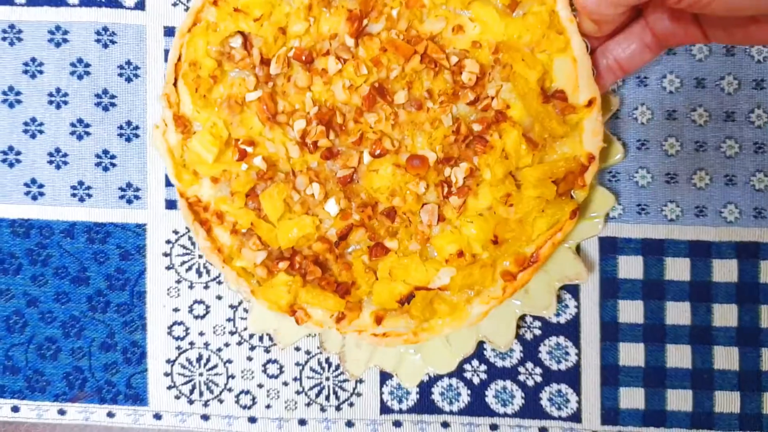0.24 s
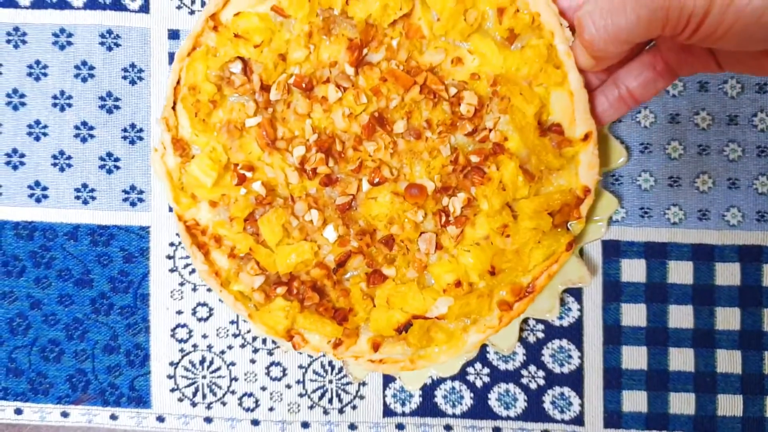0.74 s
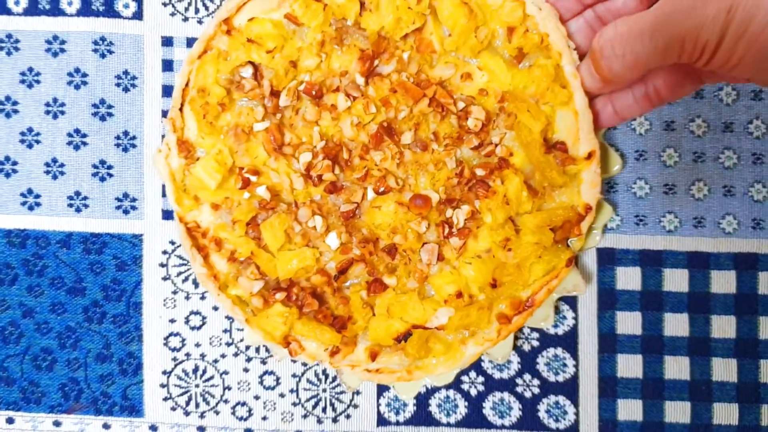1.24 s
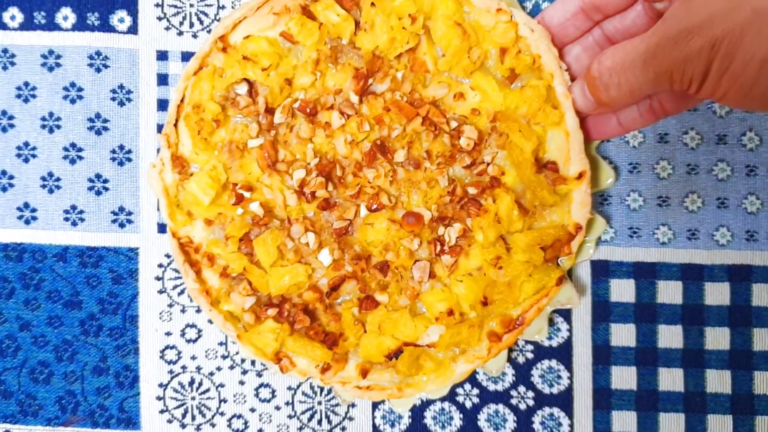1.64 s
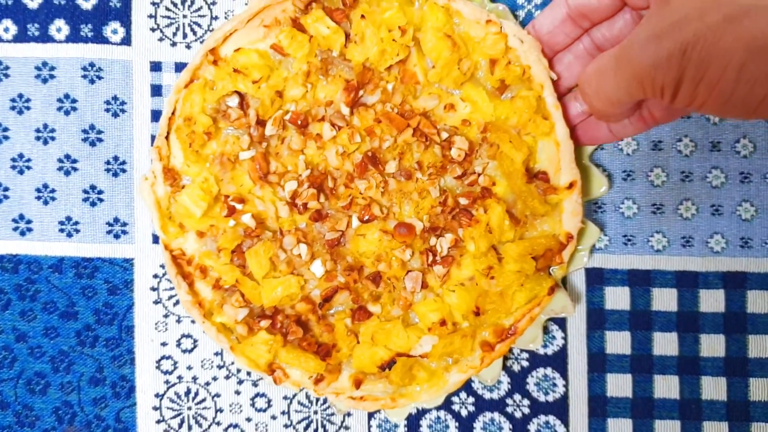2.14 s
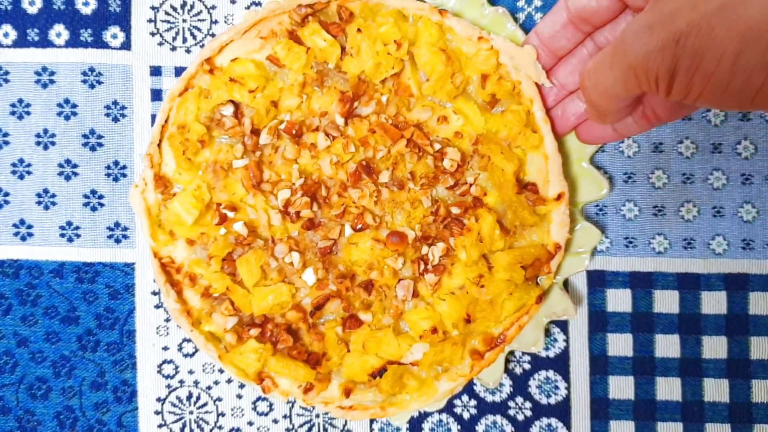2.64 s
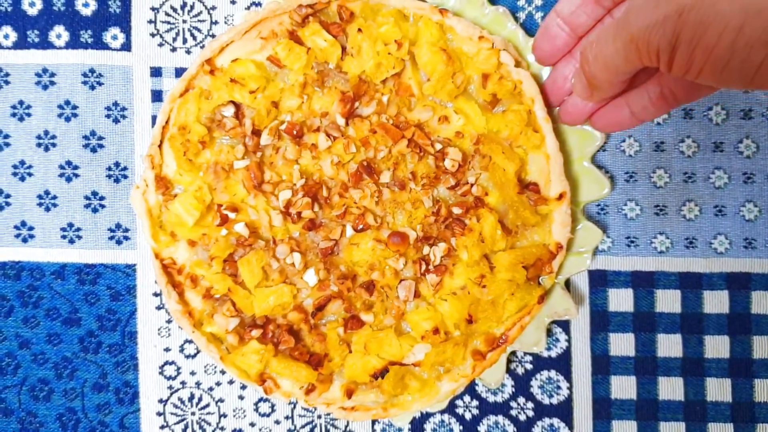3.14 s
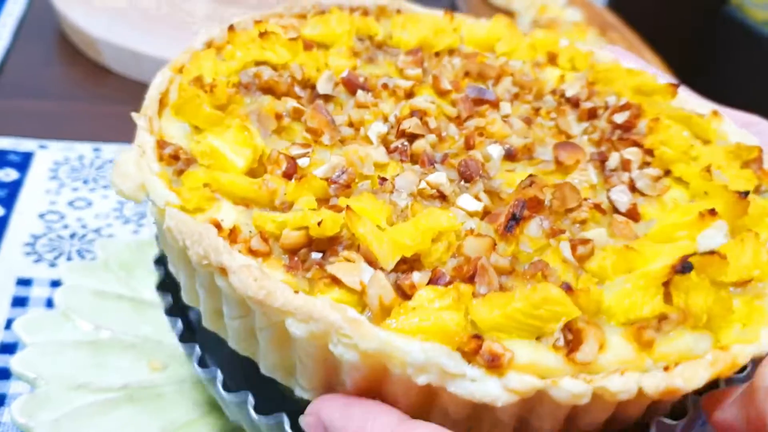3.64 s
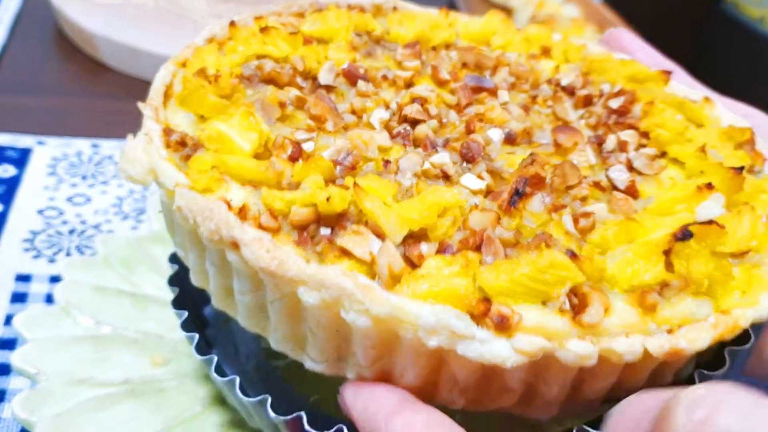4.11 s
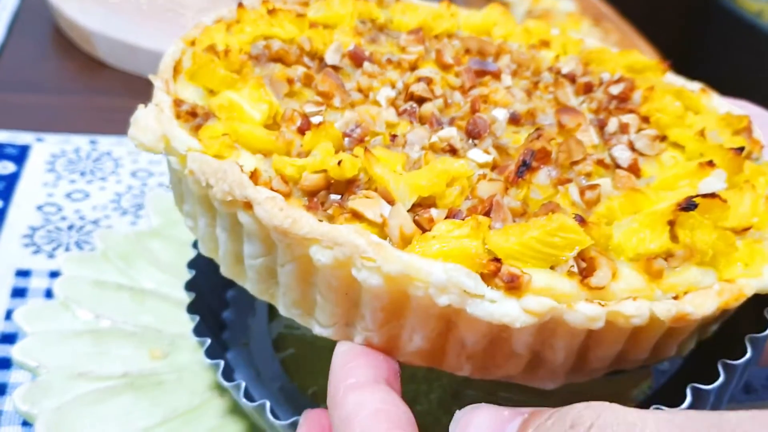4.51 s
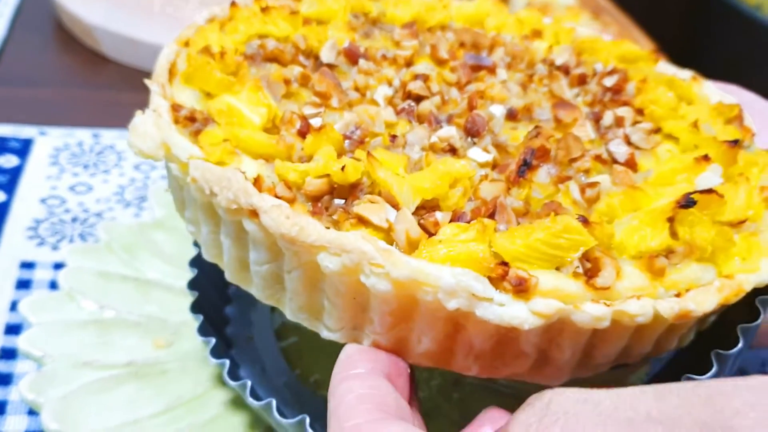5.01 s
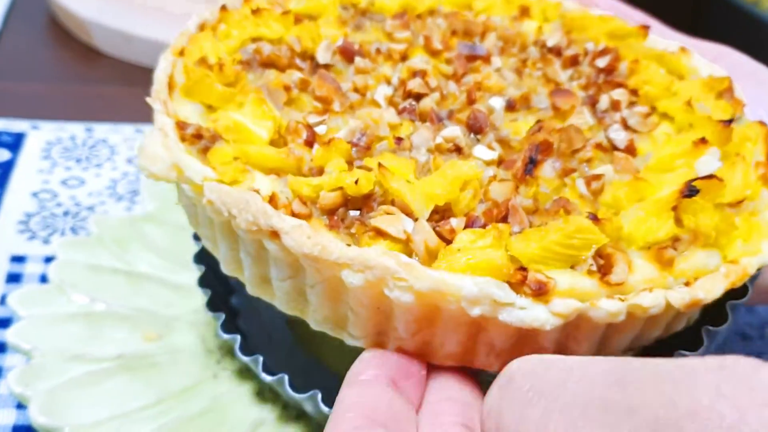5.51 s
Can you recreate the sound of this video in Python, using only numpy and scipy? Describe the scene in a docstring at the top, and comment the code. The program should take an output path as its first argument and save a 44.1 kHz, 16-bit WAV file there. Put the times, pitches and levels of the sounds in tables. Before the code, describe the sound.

A soft tap and then one loud, quickly damped knock sound as a ceramic plate is set on a tablecloth, a little way from the stereo microphone, with a short kitchen echo. Heard from closer, a metal tart tin then scrapes softly and clinks against the plate, making it ring briefly. A low fridge hum continues underneath.

```python
"""A quiet kitchen with a humming fridge, on a stereo microphone. From the far position, a loaded ceramic
plate knocks on a cloth-covered table: the cloth mutes its modes, the table top thumps, the room echoes.
Then, from a closer position to the plate's right, a metal tart tin slides and clinks on it: grit hisses
under the tin and sets the plate singing, and each clink clacks the tin and rings the plate."""
import sys
import numpy as np
from scipy import signal
from scipy.fft import rfft, irfft
from scipy.io import wavfile
from scipy.ndimage import uniform_filter1d

SR = 44100
rng = np.random.default_rng(int(sys.argv[2]) if len(sys.argv) > 2 else 0)


def waveform_to_disk(signal):
    """Save audio, clipped to [-1, 1], as 16-bit WAV at the path in sys.argv[1]."""
    frames = np.transpose(np.atleast_2d(signal))
    scaled = np.clip(frames, -1, 1) * 32767
    samples = np.round(scaled).astype(np.int16)
    wavfile.write(sys.argv[1], SR, samples)


N = 254016
CLOSE_S, CUT_S = 3.352, 5.718  # the close position begins; the tin's sound drops abruptly at a cut


def gain_of(db):
    """dB to gain."""
    return 10 ** (np.asarray(db) / 20)


def unit_rms(x):
    """Scales to rms 1."""
    return x / np.sqrt(np.mean(x ** 2) + 1e-20)


def curve_at(points, hz):
    """Reads a curve on a log-frequency axis."""
    f, value = np.transpose(points)
    return np.interp(np.log(hz + 1), np.log(f + 1), value)


def add(mix, s, sound):
    """Mixes a sound in at second s."""
    part = mix[..., round(s * SR):][..., :sound.shape[-1]]
    part += sound[..., :part.shape[-1]]


def colour(x, points, late_s=0.):
    """Filters by a dB spectrum and delays."""
    hz = np.fft.rfftfreq(len(x), 1 / SR)
    return irfft(rfft(x) * gain_of(curve_at(points, hz)) * np.exp(-2j * np.pi * hz * late_s), len(x))


# Room tone at the far and the close position. Each row: frequency in Hz, relative level in dB.
FAR_TONE = [(20, -17.5), (48, -6.5), (150, -7.5), (293, -16.5), (330, -18.5), (607, -15.5), (900, -23),
            (1500, -29.5), (4000, -44), (5900, -52.5), (7700, -47), (8700, -61.5), (12000, -55),
            (16000, -60)]
CLOSE_TONE = [(20, -10), (60, -7), (123, -6), (285, -12), (400, -14), (1260, -19.5), (2320, -31.5),
              (4400, -34.5), (5900, -40.5), (7700, -38), (8700, -54), (16000, -74.5)]
# The room across the microphone. Each row: frequency in Hz, left-right likeness from 0 to 1.
LIKENESS = [(60, 0.94), (300, 1), (700, 0.38), (1500, 0.11), (4000, 0.054), (15000, .05)]
# The room tone leans left. Each row: frequency in Hz, left minus right in dB.
TONE_LEAN = [(60, 2), (180, 0.5), (550, 1.5), (1650, 1.5), (4970, 5.5), (15000, 4.5)]
def room_tone(spectrum, level_db, left_lead_s=.00043):
    """Air and fridge noise, alike on both sides of the microphone only in the bass."""
    frames, hz = N // 512 + 5, np.fft.rfftfreq(2048, 1 / SR)
    a, b, c, d = rng.standard_normal((frames, 1025, 4)).T
    left, unrelated = a + 1j * b, c + 1j * d
    same = np.clip(curve_at(LIKENESS, hz), 0, 1)[:, None]
    delay = np.exp(-2j * np.pi * hz * left_lead_s)[:, None]
    right = same * left * delay + np.sqrt(1 - same ** 2) * unrelated
    lean_db = curve_at(TONE_LEAN, hz) / 2
    gains = gain_of(curve_at(spectrum, hz) + np.array([lean_db, -lean_db]))
    noise = signal.istft(np.array([left, right]) * gains[..., None], nperseg=2048, noverlap=1536)[1]
    return gain_of(level_db) * unit_rms(noise[:, :N])


# The fridge from each position. Each row: rms level in dB, waver width in Hz, waver depth.
FAR_HUM = [(-67.5, 6, .5), (-57.5, 3.6, 0.22), (-73, 6, .5), (-81.5, 6.5, .5), (-75, 4, .4)]
CLOSE_HUM = [(-63.5, 35, 0.27), (-53.5, 40, 0.7), (-66, 12.5, 1), (-95, 14, .6), (-77.5, 6.7, 0.43),
             (-71, 1.8, .6)]
FAR_HUM_HZ, CLOSE_HUM_HZ = [360, 471, 530, 592, 1394], [59, 118, 296, 355, 414, 473]
def fridge_hum(hum_hz, lines, left_lead_s=.00015):
    """Narrow, wavering hum lines that reach the left side a little early."""
    t = np.arange(N) / SR - left_lead_s * np.c_[[0, 1]]
    out = np.zeros((2, N))
    for hz, (db, width_hz, depth) in zip(hum_hz, lines):
        r = np.exp(-np.pi * width_hz / SR)
        waver = unit_rms(signal.lfilter([1], [1, -2 * r, r * r], rng.standard_normal((2, N))))
        line = (1 + depth * (waver[0] + 1j * waver[1])) * np.exp(2j * np.pi * hz * t)
        out += gain_of(db) * unit_rms(line.real)
    return out


# The frequencies in Hz at which a blow's colour, its shade, is set.
SHADE_HZ = [1100, 1750, 3100, 5000, 7600, 12000]
def shade(tilt_db, rounding_db):
    """A blow's colour in dB: a tilt per octave, less a rounding per octave squared."""
    octaves = np.log2(np.divide(SHADE_HZ, SHADE_HZ[2]))
    return tilt_db * octaves - rounding_db * octaves ** 2


def ring(hz, db, t60, shade_db=(0,) * 6, damping=0.95, *, rise_s, size):
    """Decaying modes after one blow, weighted by its colour."""
    db = db + curve_at(np.c_[SHADE_HZ, shade_db], hz)
    t = np.arange(size) / SR
    decay = gain_of(db[:, None] - 60 * t * damping / t60[:, None])
    attack = (1 - np.exp(-t / rise_s)) ** 2
    return (decay * np.sin(2 * np.pi * hz[:, None] * t)).sum(0) * attack


# The contact's crack, as coloured by the microphone. Each row: frequency in Hz, relative level in dB.
CRACK_AT_MIC = [(500, -25), (1500, -1), (5000, 1), (6000, -9), (7800, -3.5), (9000, -13.5), (12000, -21),
                (16000, -27)]
def crack(shade_db, t60):
    """The contact's dry crack, as coloured by the microphone."""
    t = np.arange(3000) / SR
    noise = colour(rng.standard_normal(len(t)), CRACK_AT_MIC)
    noise = colour(noise, np.c_[SHADE_HZ, shade_db])
    return unit_rms(noise) * gain_of(-60 * t / t60) * (1 - np.exp(-t / .0005))


# Knocks from the far position. Each row: start in seconds, level in dB, damping factor, tilt in dB per
# octave, rounding in dB per octave squared, echo send in dB, left minus right in dB.
PLATE_KNOCKS = [(0.6194, -28, 2.1, -4.5, 4.5, 6, 6), (0.6875, -39, 2.2, -5.5, 5, 4.5, 8),
                (2.336, -39.5, 2.3, -2.5, 0, 6, 3.5), (2.3535, -19.5, 1.1, -0.5, 2, 0, 2),
                (2.359, -15, 0.74, -4, -3.3, -0.5, 5), (2.3613, -5, 2.7, -0.16, 1.85, 0.3, 5.5),
                (2.364, -14.5, 1.7, 2.5, 2.5, -1.7, 3.5), (2.3783, -23.5, 1.9, 3, 1.5, -5.2, 3.5),
                (2.663, -65, 4.8, -9, -4, -2.1, 1), (3.0178, -35.5, 1.9, -15, 0.5, 4.5, 9)]
# The loaded plate pressed into cloth: its modes in Hz. Each row after that: level in dB, t60 in seconds.
MUTED_HZ = np.array([730, 880, 960, 1066, 1200, 1720, 1892, 2352, 2702, 3140, 3350, 3850, 4100, 4798, 5132, 7630, 8320, 11000])
MUTED_MODES = [(-22, 0.029), (-11, .035), (0, 0.086), (9, 0.078), (13.5, 0.016), (9.5, 0.032),
               (-5.5, 0.078), (-8, 0.011), (2.5, 0.023), (-5.5, 0.095), (2.5, 0.029), (-4.5, 0.012),
               (-13, 0.012), (-13, .025), (-1.5, 0.046), (-12, .03), (-19.5, 0.09), (-33, 0.0139)]
# The table top. Each row: frequency in Hz, level in dB, t60 in seconds.
TABLE_MODES = [(76.5, -1, 0.11), (186, 3.5, 0.089), (330, -5.5, 0.059), (439, -12, 0.058)]
# Echo reaching the far position. Each row: frequency in Hz, gain in dB.
FAR_ECHO = [(300, -4.5), (620, -10), (1000, -14), (1900, -4), (3200, -4.5), (6000, -1.5), (12000, 1.5)]
def plate_knocks():
    """The plate meets the cloth: muted modes, a dry crack, a table thump and the kitchen's echo."""
    plate, thump, echo_send = np.zeros((2, N)), np.zeros(N), np.zeros(N)
    table = ring(*np.transpose(TABLE_MODES), rise_s=0.005, size=12000)
    for s, db, damping, tilt_db, rounding_db, echo_db, left_db in PLATE_KNOCKS:
        shade_db = shade(tilt_db, rounding_db)
        blow = ring(MUTED_HZ, *np.transpose(MUTED_MODES), shade_db, damping, rise_s=0.00024, size=5000)
        blow /= abs(blow).max()
        add(blow, 0, gain_of(-12) * crack(shade_db, t60=0.029))
        add(plate, s, gain_of(db + np.c_[[left_db, -left_db]] / 2) * blow)
        add(echo_send, s, gain_of(db + echo_db) * blow)
        add(thump, s, gain_of(-12.5 + 1.9 * db) * table)  # the thump grows faster than the blow
    return plate + thump * gain_of([[1.1], [-1.1]]) + kitchen_echo(colour(echo_send, FAR_ECHO))


# The kitchen's decay. Each row: frequency in Hz, t60 in seconds.
KITCHEN_T60 = [(100, .2), (500, 0.27), (1100, 0.26), (2000, 0.24), (4000, 0.25), (8000, 0.16),
               (15000, 0.23)]
def kitchen_echo(x):
    """Sparse reflections of random sign, each band dying at its own speed, alike in the bass."""
    taps = np.zeros((2, SR // 2))
    slots = np.arange(120, SR // 2 - 20, 20)
    arrivals = slots + rng.integers(0, 20, (2, len(slots)))
    np.put_along_axis(taps, arrivals, rng.choice([-1., 1.], arrivals.shape), 1)
    hz, t, (left, unrelated) = signal.stft(taps, SR, nperseg=256)
    same = np.clip(curve_at(LIKENESS, hz), 0, 1)[:, None]
    right = same * left + np.sqrt(1 - same ** 2) * unrelated
    decay = gain_of(-60 * t / curve_at(KITCHEN_T60, hz)[:, None])
    tail = signal.istft(np.array([left, right]) * decay, SR, nperseg=256)[1]
    return signal.fftconvolve(x[None], tail / np.linalg.norm(tail[0]), axes=1)[:, :N]


# Slow sliding, close up. Each row: time in seconds, scrape level in dB.
SLIDE_LEVELS = [(3.351, -63.5), (3.5, -59), (3.62, -62.5), (3.74, -62), (3.88, -67), (3.95, -61.5),
                (4.051, -57), (4.15, -57.5), (4.2, -62.5), (4.28, -61), (4.38, -59.5), (4.55, -81),
                (4.7, -70), (4.85, -61), (5.0, -69), (5.3, -67), (5.4, -70), (5.72, -72)]
# The grit's hiss. Each row: frequency in Hz, relative level in dB.
SCRAPE_SPECTRUM = [(800, -22), (1220, -10), (2000, -0.5), (3010, 12.5), (4800, -6), (6500, 7), (8650, -3.5),
                   (11500, -3), (14000, -9), (16000, -16)]
# Quick slips. Each row: crest time in seconds, rise in seconds, crest level in dB, low cut in Hz.
TIN_SLIPS = [(3.541, .003, -60, 5030), (3.625, 0.013, -58.5, 5000), (3.806, 0.023, -55.5, 6000),
             (3.831, 0.014, -51.5, 2480), (4.32, 0.022, -52, 8000), (4.756, 0.0036, -48, 2000),
             (4.914, 0.0083, -38.5, 2450), (5.44, 0.032, -50, 5960), (5.605, .008, -60, 5000),
             (5.685, 0.026, -51.5, 6000)]
def tin_slide():
    """Grit under the moving tin hisses and feeds the plate's modes; quick slips add bright swishes."""
    t = np.arange(N) / SR
    scrape_db = np.interp(t, *np.transpose(SLIDE_LEVELS))
    excess_db = scrape_db + 66  # above a gentle slide
    noise = rng.standard_normal(N)
    roughness_db = 1.9 * unit_rms(uniform_filter1d(rng.standard_normal(N), size=60))
    grit = unit_rms(noise * gain_of(roughness_db))
    hiss = unit_rms(colour(grit, SCRAPE_SPECTRUM))
    low = signal.sosfiltfilt(signal.butter(2, 9000, fs=SR, output="sos"), hiss)
    tilt_db = 2 + .9 * excess_db  # faster sliding is brighter
    out = (low * gain_of(-tilt_db) + (hiss - low) * gain_of(tilt_db)) * gain_of(scrape_db)
    force = gain_of(-69.5 + 0.43 * excess_db)  # the plate's ring follows the scrape only in part
    for crest_s, rise_s, db, low_hz in TIN_SLIPS:
        span = slice(round((crest_s - .1) * SR), round((crest_s + .2) * SR))
        late_s = t[span] - crest_s
        fall_s = 0.0089 * gain_of(0.73 * (db + 46))  # stronger slips trail longer
        swell = np.where(late_s < 0, np.exp(-(late_s / rise_s) ** 2), np.exp(-abs(late_s) / fall_s))
        low_cut = signal.butter(2, low_hz, "high", fs=SR, output="sos")
        out[span] += gain_of(db) * swell * signal.sosfilt(low_cut, hiss[span])
        force[span] += gain_of(db + 0.5) * swell
    return out + plate_singing(grit * force)


# The free plate: its modes in Hz. Each row after that: level in dB struck at the rim, level in dB
# struck at the foot, t60 in seconds.
PLATE_HZ = np.array([936, 1210, 1432, 1701, 1868, 2036, 2256, 2503, 2745, 2950, 3042, 3146, 3289, 3440, 3850, 4210, 4592, 5120, 5245, 6247, 6670, 7420, 7619, 8190, 9150, 10760, 11650, 12400, 14200])
PLATE_MODES = [(-30.5, -17, 0.38), (-39, -14, 0.092), (-26, -22, 0.084), (1.5, -18, 0.23), (-49, 12, 0.22),
               (-23.5, -5.5, 0.46), (-22, -45, 0.31), (-21, -32, 0.24), (-17, -7, 0.15), (0, -1, 0.094),
               (10.5, -16, 0.077), (-23, -19, 0.27), (-4, -1.5, 0.11), (-17, -16, 0.11), (-36, -20, 0.14),
               (-47, -28, .2), (1.5, -30, 0.092), (-21, -15, 0.09), (-7, -5, 0.093), (2, -41, 0.045),
               (-12, -20, 0.068), (-37, -33, 0.11), (-5.5, 2.5, 0.096), (-28, -19, 0.15), (-39, -22, 0.055),
               (-27, -7, 0.14), (-22, -28, 0.049), (-24, -33, .05), (-32, -33, 0.054)]
# How rubbing feeds the modes. Each row: frequency in Hz, gain in dB.
RUB_COUPLING = [(936, -19.5), (1210, -7), (1700, -25), (2400, -38), (3050, -11), (3400, -24), (4600, -28),
                (6250, -14.5), (7600, -14.5), (9150, -15), (14200, -21)]
def plate_singing(push, damping=1.9, flare_db=7.8):
    """The contact wanders over the plate, so each mode flares for a moment and fades."""
    start, out = round(CLOSE_S * SR), np.zeros(N)
    flares = rng.standard_normal((40, len(PLATE_MODES)))
    path = np.linspace(0, 39, N - start)
    for hz, (_, _, t60), flare in zip(PLATE_HZ, PLATE_MODES, flares.T):
        wander_db = flare_db * np.interp(path, np.arange(40), flare)
        drive = push[start:] * gain_of(curve_at(RUB_COUPLING, hz) + wander_db)
        r, cosine = 10 ** (-3 * damping / (t60 * SR)), np.cos(2 * np.pi * hz / SR)
        mode = signal.lfilter([1, -cosine], [1, -2 * r * cosine, r * r], drive)
        out[start:] += np.sqrt(1 - r * r) * mode
    return out


# The tin, held in the fingers. Each row: frequency in Hz, level in dB, t60 in seconds.
TIN_MODES = [(540, -19.5, 0.029), (1248, -9.5, 0.072), (1752, 4.5, 0.029), (2140, -10.5, 0.052),
             (3097, 0.5, 0.04), (3896, -2.5, 0.023), (5137, -5.5, 0.061), (6264, 5, 0.012),
             (7730, -1.5, 0.021), (9380, -12, 0.02), (11070, -10, 0.013), (12900, -18, 0.017)]
# Nudges, close up. Each row: start in seconds, strength in dB, damping factor.
TIN_NUDGES = [(3.765, -58, 1.2), (3.824, -51, .55), (4.619, -41, 1.1), (5.1455, -42, .45)]
# Their dull colour, in dB at each of SHADE_HZ.
NUDGE_SHADE = [20, -5, -7, -18, -12, -10]
def tin_nudges():
    """A slow, soft contact on the tin's floor wakes its low notes and leaves the plate alone."""
    out = np.zeros(N)
    for s, db, damping in TIN_NUDGES:
        tin = ring(*np.transpose(TIN_MODES), NUDGE_SHADE, damping, rise_s=.002, size=8000)
        add(out, s, gain_of(db) * tin)
    return out


# Tin on plate, close up. Each row: start in seconds, strength in dB, damping factor, strike spot from
# rim (0) to foot (1), tilt in dB per octave, rounding in dB per octave squared.
TIN_CLINKS = [(4.241, -23, 0.89, .17, -0.9, .3), (4.6332, -16.5, 0.99, .17, -1, 0.3),
              (4.753, -42.5, 3, 0.34, -6, -0.5), (4.8135, -50, .9, .3, -8, 2.5),
              (4.9166, -23.5, 1.34, 0.38, -1.8, 1.2), (5.1747, -27, 1.36, 0.65, -1.8, 1.2),
              (5.2854, -56.5, 1.7, 0.77, -5.5, 0), (5.4689, -46.5, 1.8, 0.63, -7.5, 0),
              (5.605, -43, 1.2, 0.5, -6, 1.6), (5.6905, -40.5, 1.8, 0.6, -1.3, -0.7)]
def tin_clinks(free_hz=2036):
    """Each touch clacks the tin and rings the plate; the strike spot weights the plate's modes."""
    rim_db, foot_db, t60 = np.transpose(PLATE_MODES)
    out = np.zeros(N)
    for s, db, damping, spot, tilt_db, rounding_db in TIN_CLINKS:
        shade_db = shade(tilt_db, rounding_db)
        modes_db = rim_db + spot * (foot_db - rim_db)
        held_t60 = t60 / np.where(PLATE_HZ == free_hz, 1, damping)  # the grip leaves one mode ringing
        clink = ring(PLATE_HZ, modes_db, held_t60, shade_db, damping=0.97, rise_s=0.0019, size=16000)
        clack = ring(*np.transpose(TIN_MODES), shade_db, rise_s=0.00027, size=5000)
        clack_db = -0.53 - 0.16 * db  # light touches clack the tin more than they ring the plate
        add(clink, 0, gain_of(clack_db) * clack)
        add(clink, 0, gain_of(clack_db - 5) * crack(shade_db, t60=0.047))
        add(out, s, gain_of(db) * clink)
    return out


# Close up, the microphone's right side is shadowed from the tin. Each row: frequency in Hz, gain in dB.
RIGHT_SHADOW = [(300, -20), (1000, -8), (1700, -18), (3500, -4.5), (7000, -40), (15000, -31)]
def scene():
    """The far position for the knocks, then the close one for the tin."""
    t = np.arange(N) / SR
    far = room_tone(FAR_TONE, level_db=-52) + fridge_hum(FAR_HUM_HZ, FAR_HUM) + plate_knocks()
    tin = tin_clinks() + tin_nudges() + tin_slide()
    close = np.array([tin, colour(tin, RIGHT_SHADOW, late_s=.0001)]) + gain_of(-13.5) * kitchen_echo(tin)
    close *= np.clip((CUT_S - t) / 0.0015, .25, 1)  # the tin's sound drops abruptly at the cut
    close += room_tone(CLOSE_TONE, level_db=-53.5) + fridge_hum(CLOSE_HUM_HZ, CLOSE_HUM)
    switch = np.clip((t - CLOSE_S) / 0.0015, 0, 1)
    return far * (1 - switch) + close * switch


def record(dry):
    """The recorder's band limit, just under 16 kHz."""
    lowpass = signal.firwin(511, 15950, window=("kaiser", 9), fs=SR)
    return signal.oaconvolve(dry, lowpass[None], "same")


dry = scene()
out = record(dry)
waveform_to_disk(out)
```